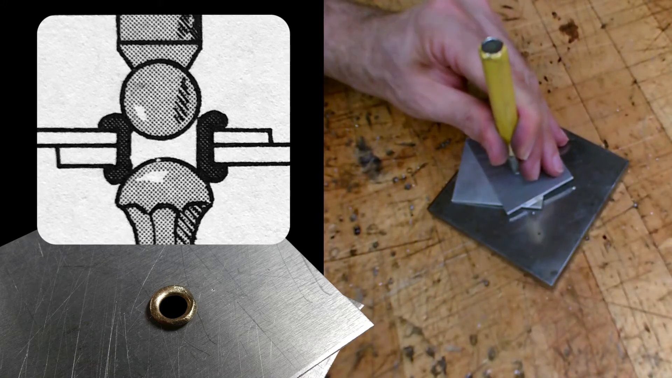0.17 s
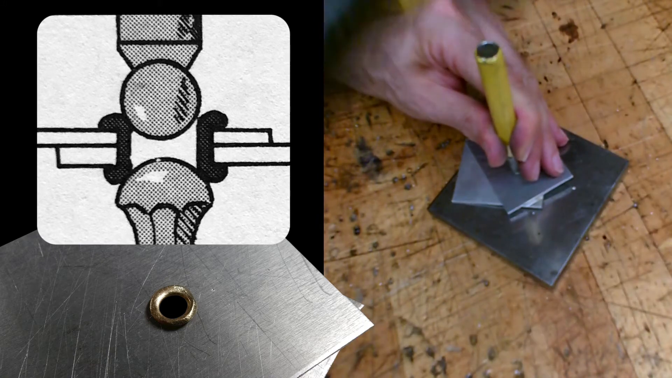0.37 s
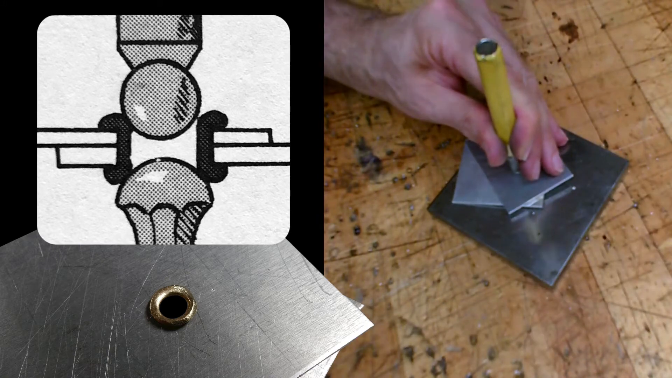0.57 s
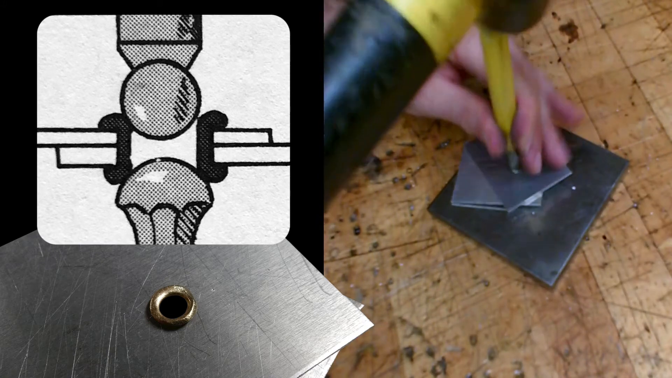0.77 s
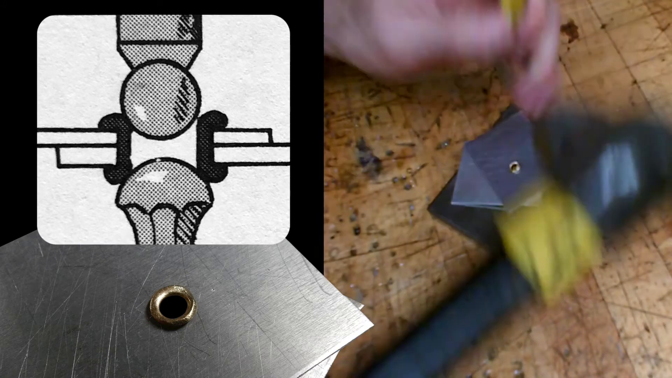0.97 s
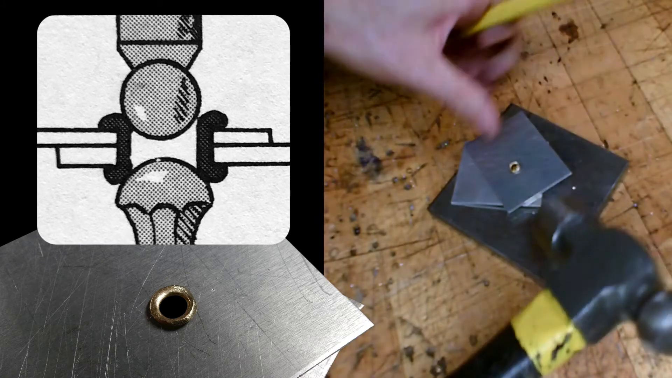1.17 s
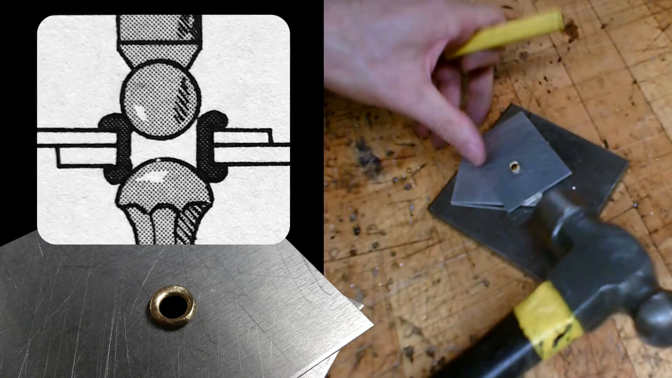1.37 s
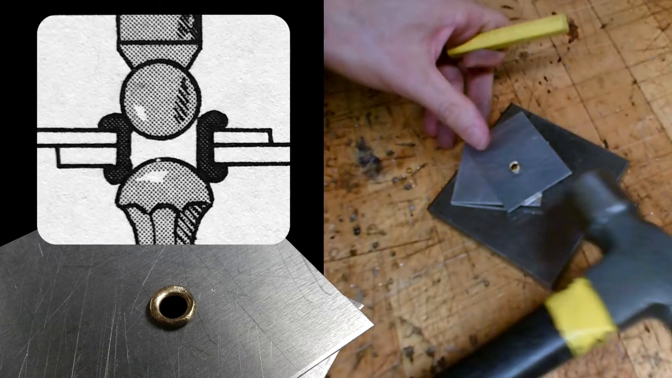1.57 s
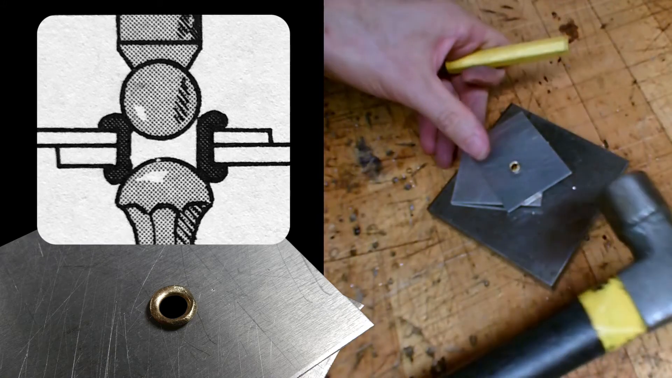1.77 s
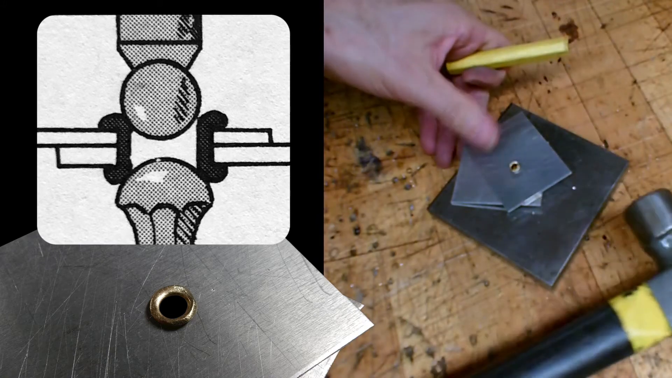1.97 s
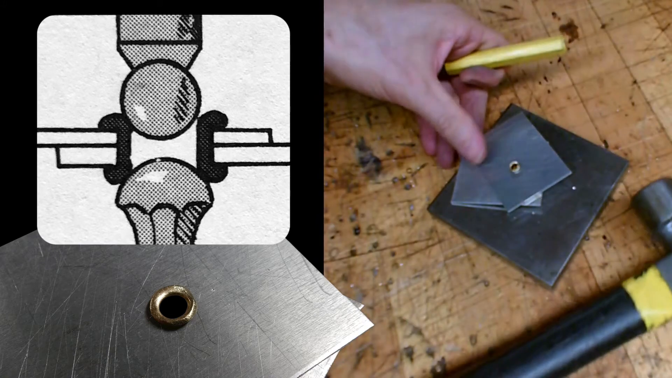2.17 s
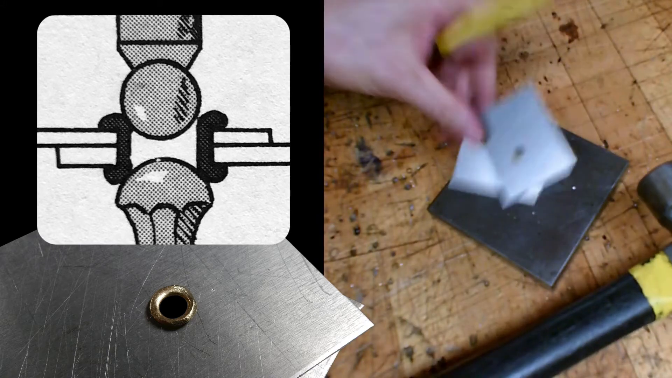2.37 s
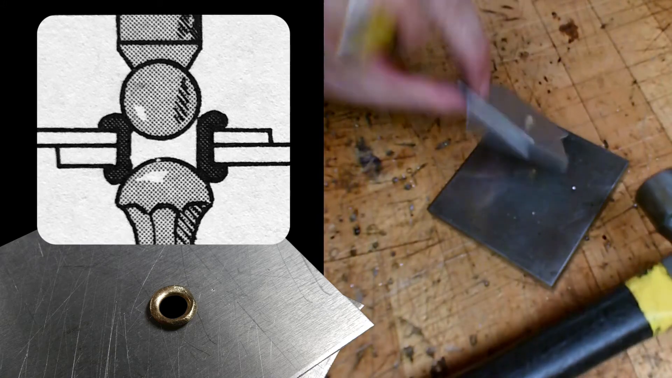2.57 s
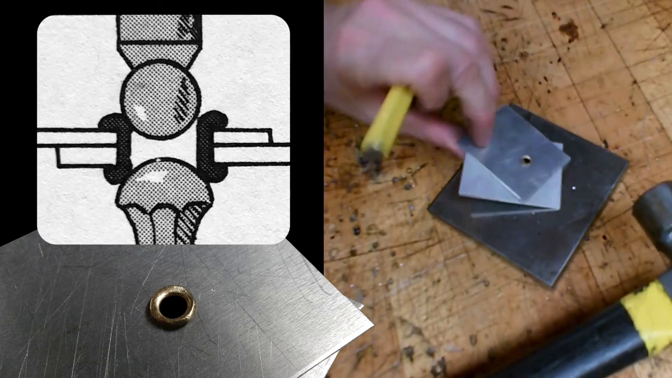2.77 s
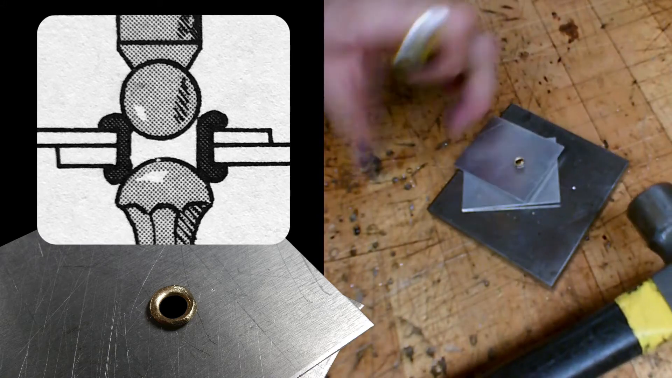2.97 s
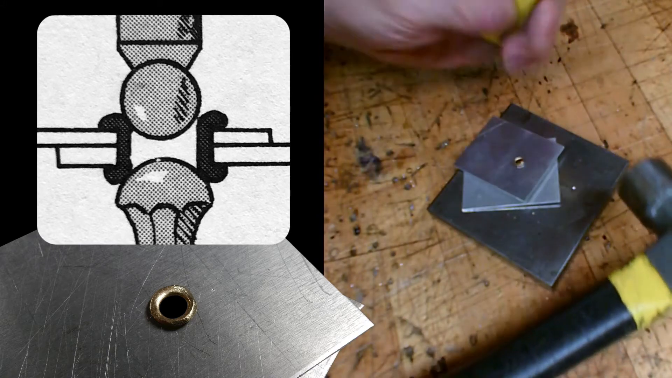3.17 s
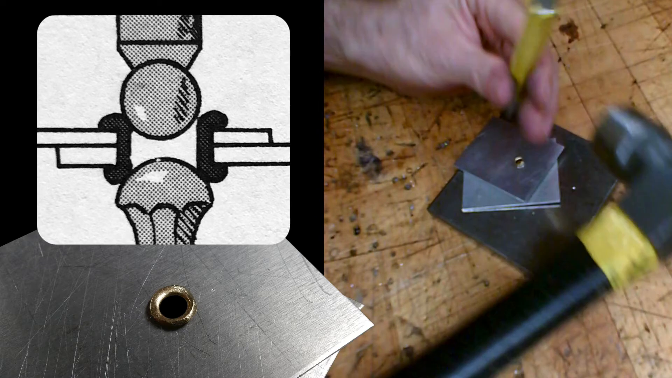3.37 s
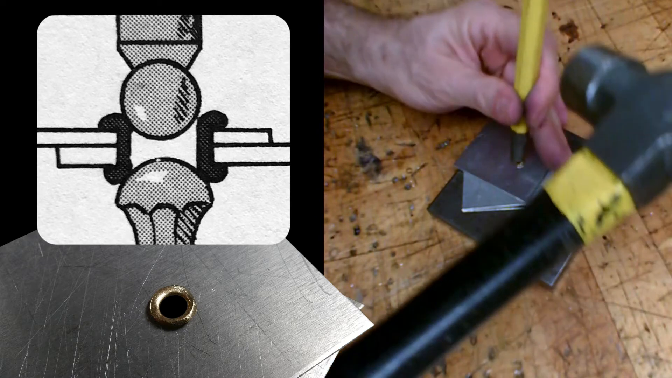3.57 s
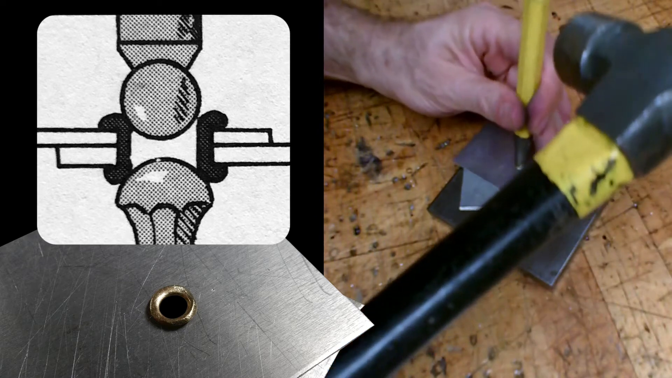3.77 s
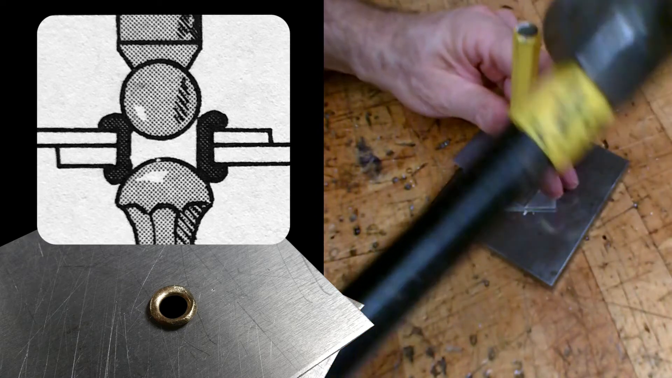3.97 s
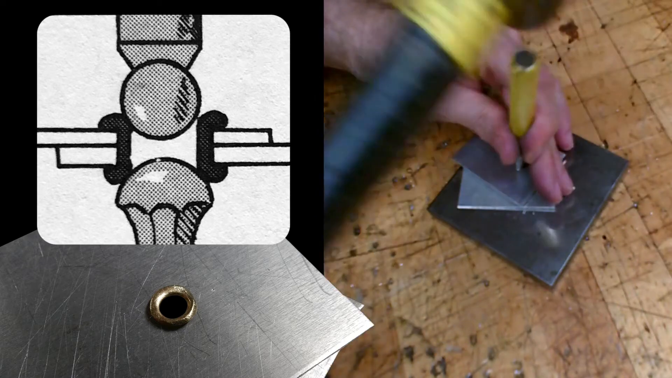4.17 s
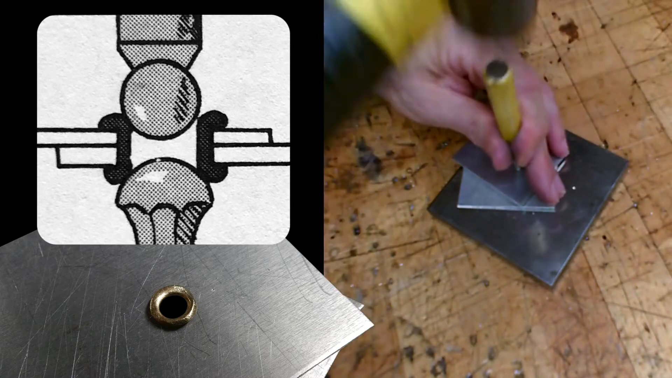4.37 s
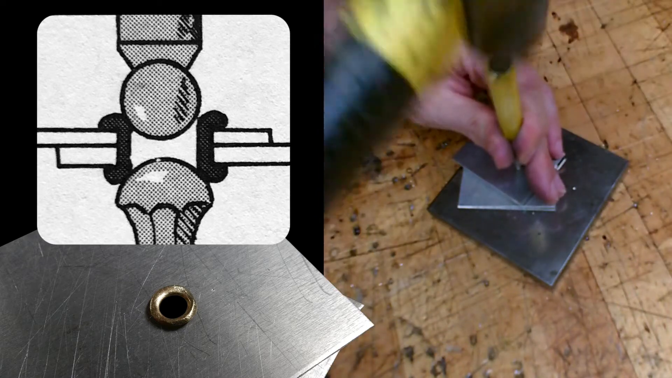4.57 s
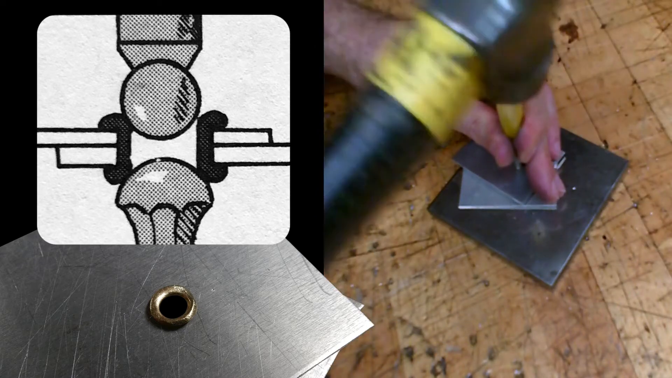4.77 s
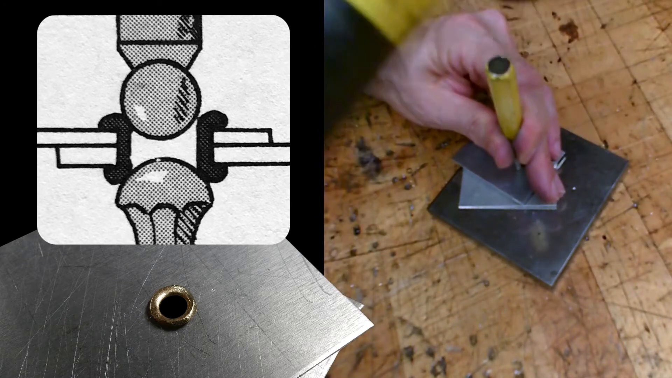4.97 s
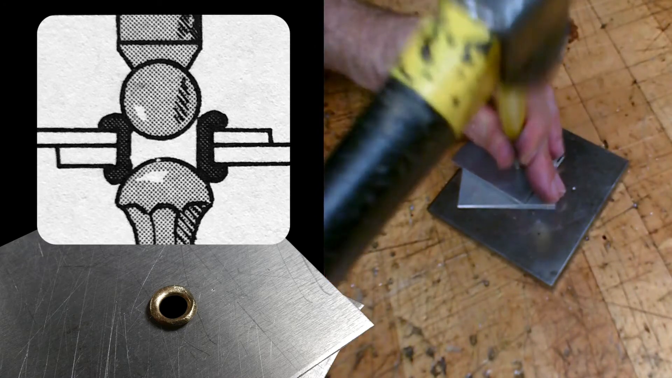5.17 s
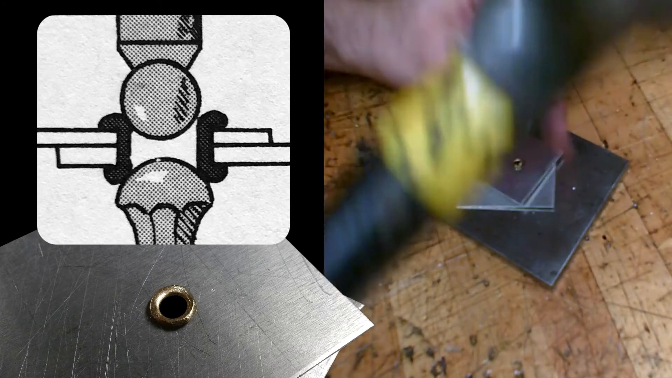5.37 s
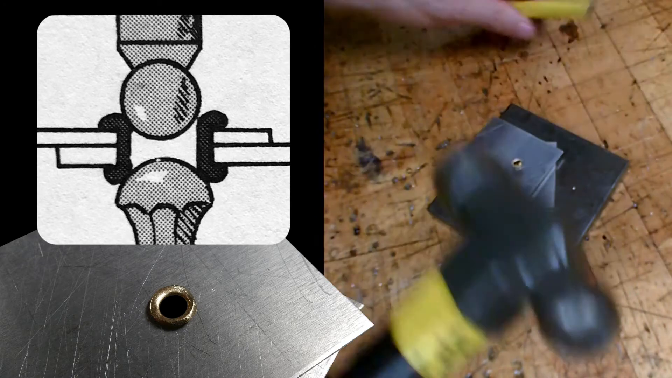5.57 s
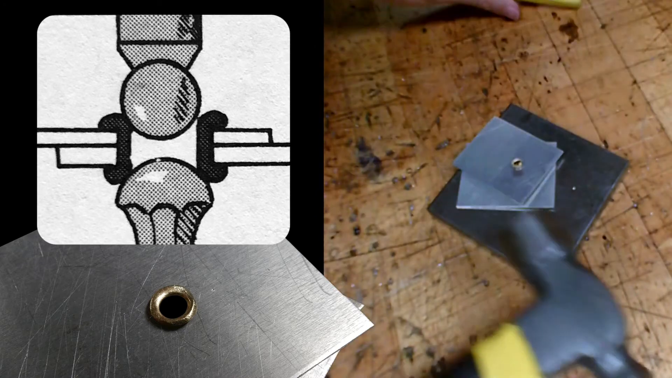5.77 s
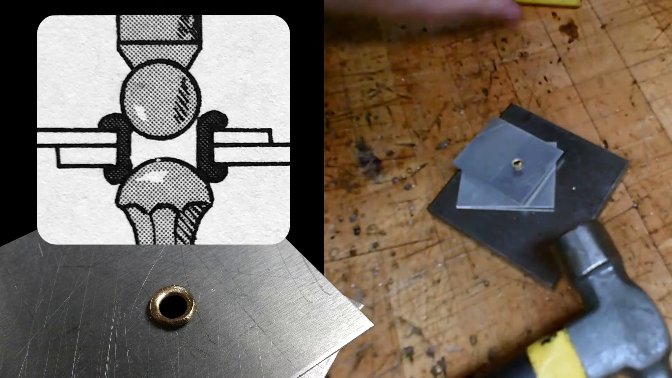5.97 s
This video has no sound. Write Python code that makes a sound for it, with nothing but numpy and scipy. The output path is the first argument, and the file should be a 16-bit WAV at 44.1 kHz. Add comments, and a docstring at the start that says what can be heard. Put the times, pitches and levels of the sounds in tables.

```python
"""Riveting at the workbench

In a workshop, a hammer drives a steel punch onto a rivet in two small plates, on a steel block on a
wooden bench. A brief hiss, two blows, a loose rattle; the plates are turned over, three more blows,
and the hammer is laid down. Ventilation runs behind. The microphone is close: it overloads on the
blows, and again in the draught of the hammer swinging past."""
import sys
import numpy as np
from scipy import signal
from scipy.fft import rfft, irfft
from scipy.io import wavfile
from scipy.ndimage import uniform_filter1d

SR = 44100
rng = np.random.default_rng(int(sys.argv[2]) if len(sys.argv) > 2 else 0)


def to_wav(s):
    """Save 16-bit WAV."""
    ch = np.atleast_2d(s).T  # columns
    pcm = np.round(np.clip(ch, -1, 1) * 32767)  # PCM
    wavfile.write(sys.argv[1], SR, pcm.astype(np.int16))


N = 265702
T = np.arange(SR) / SR  # one second, for single sounds
TIME = np.arange(N) / SR

# hammer blows: start_s, force_db, crack_db, plate_db, punch_db, block_db, plate_tuning_ratio
HAMMER_BLOWS = [(0.2169, -1, 1, -2, -16, 0.5, 0.98), (0.5698, 0, 3, 1, -6.5, -1.5, 1.01),
                (4.4194, -11, 4, -8, -10, -6.5, 0.84), (4.737, -1.5, -0.5, -9.5, -7, -1.5, 1.2),
                (5.0516, -0.5, 2.5, -9.5, 1.5, 2, 1.12)]
# light touch of steel on steel: frequency_hz, density_db
TICK_SPECTRUM = [(1000, -44), (2500, 2.5), (6000, 7), (9000, -1), (15500, -12.5)]
# plate clapping on plate: frequency_hz, density_db
SLAP_SPECTRUM = [(500, -25), (1500, -15), (2500, -8.5), (4000, 0), (6000, 3.5), (8500, 0), (12000, -11),
                 (15500, -11)]


def blows():
    """Steel cracks on steel, plates and block buzz, the bench thuds and everything on it is jolted."""
    # modes of each struck part: pitch_hz, level_db, t60_s
    punch_modes = [(3640, -17, 0.13), (4066, -21, .13), (4200, -22, 0.1), (7974, -30, .08),
                   (9266, -25, 0.045), (10500, -19, 0.1), (13670, -35.5, .08)]
    plate_modes = [(3502, 2, 0.026), (3530, -8.5, 0.015), (4520, -11.5, 0.017), (5280, -9, 0.0077),
                   (6320, -13, 0.0092), (9080, -10, 0.009)]
    block_modes = [(1290, -2.5, 0.0077), (1560, 2, 0.011), (1906, -6.5, .005)]
    bench_modes = [(93.5, -22, .2), (114, -19, 0.17), (169.4, -26.5, 0.3), (248.7, -23, 0.44),
                   (292.3, -15, 0.18), (430.3, -16, 0.11), (457, -21.5, .25), (541.6, -1.5, 0.11),
                   (536.5, -15, .35), (560, -17, 0.41), (622.4, -21.5, 0.073), (767, -18, .16),
                   (975, -9, 0.087), (1234, -15.5, 0.048), (1559, -10, .05), (1880, -23.5, 0.04)]
    # the impact, the plates' after-buzz, things jolted on the bench: frequency_hz, density_db
    crack_spectrum = [(200, 6), (600, 4), (1500, -4), (2500, -4.5), (3800, 11), (6500, -10.5), (9500, 2),
                      (12500, -14.5), (16000, -18.5)]
    sizzle_spectrum = [(1500, -26.5), (2700, -9.5), (3550, -1), (4300, -3.5), (5300, -2.5), (6500, -9),
                       (7800, -18), (10000, -13.5), (16000, -32)]
    jolt_spectrum = [(29, -33), (50, -2), (408, -7.5), (532, -8), (842, -13.5), (997, -0.5), (1300, -17.5),
                     (2440, -17.5), (3580, -16.5), (5270, -21.5), (7210, -33.5), (10600, -31.5),
                     (16000, -42)]
    # the hammer drops back on the punch: start_s, level_db
    rebounds = [(0.242, -21.5), (0.2552, -18.5), (0.578, -6.5), (0.605, -18)]
    body, steel = np.zeros(N), np.zeros(N)
    add(body, -0.135, amp(-4) * room_boom())  # an earlier blow still hangs in the room
    for start, force_db, crack_db, plate_db, punch_db, block_db, tuning in HAMMER_BLOWS:
        crack = amp(crack_db + 6) * noise(crack_spectrum) * swell(0.0009) * fade(0.016)
        punch = amp(punch_db) * ring(punch_modes) * swell(0.00047)
        add(steel, start, amp(force_db) * (crack + punch))
        slap = amp(7) * buzz(plate_modes, tuning) * fade(0.019)
        sizzle = amp(-29) * die_away(noise(sizzle_spectrum))
        add(body, start, amp(force_db + plate_db) * (slap + sizzle) * swell(0.001))
        knock = buzz(block_modes) * (amp(-8.5) * fade(0.06) + amp(-27.5) * fade(0.6))
        add(body, start, amp(force_db + block_db) * knock * swell(0.0048))
        bench = ring(bench_modes, scatter_db=1)
        jolt = amp(-11.5) * noise(jolt_spectrum) * fade(0.19)
        thud = (bench + jolt) * swell(0.002)
        add(body, start + 0.001, amp(force_db) * (thud + room_boom()))
    for start, db in rebounds:
        add(steel, start, amp(db) * noise(crack_spectrum) * fade(0.031))
    return body + in_room(steel, wet_db=-19.5)


def rattle():
    """The second blow sets a loose part jangling; it settles in pairs of stuttering ticks."""
    # the loose part's modes: pitch_hz, level_db, t60_s
    part_modes = [(3520, 4, 0.03), (4310, -7, 0.023), (5490, 4.5, 0.027), (6400, -11, .02),
                  (7680, 1.5, 0.02), (9400, -27, .02), (11800, -27, .02)]
    # its jangle when jolted: frequency_hz, density_db
    jangle_spectrum = [(2500, -28.5), (3550, -8), (4400, -10.5), (5450, 2), (5900, -9), (6400, -6.5),
                       (7500, -18.5), (16000, -36)]
    out = np.zeros(N)
    for start, db in rocking(count=9):
        ping = amp(-9.5) * ring(part_modes, rng.uniform(0.98, 1.02)) * fade(0.048)
        tick = amp(-3.5) * noise(TICK_SPECTRUM) * fade(0.011)
        add(out, start, amp(db) * chatter((ping + tick) * swell(0.0006), spread_s=0.0025, share=0.68))
    out = in_room(out, wet_db=-14)
    jangle = amp(-25.5) * noise(jangle_spectrum) * fade(0.5) * swell(0.0062)
    add(out, HAMMER_BLOWS[1][0], jangle)
    return out


def rocking(count):
    """A part rocks from edge to edge: (start_s, level_db) of ticks whose pairs close up and fade."""
    first_s, extra_tick_s, settle_s = 0.8673, 0.98, 0.76
    rock_db, second_edge_db, settle_db = -34, 1.5, -21.5
    ticks = [(extra_tick_s, rock_db + second_edge_db)]  # one extra tick amid the rocking
    start = first_s
    for k in range(count):
        db = rock_db + settle_db * ((start - first_s) / settle_s) ** 3
        edge_gap_s = 0.0343 * 0.862 ** k
        ticks += [(start, db), (start + edge_gap_s, db + second_edge_db - 0.96 * k)]
        start += 0.05 + 0.068 * np.exp(-((k - 1.4) / 3.3) ** 2)  # slowest while the swing is wide
    return ticks


def plate_clicks():
    """Plates held in the fingers click dully, one edge touching and then the other."""
    # the held plates' modes: pitch_hz, level_db, t60_s
    held_modes = [(2500, -4.5, 0.011), (3186, -9.5, 0.051), (3510, -7, 0.021), (3820, -16, 0.011),
                  (5560, 6, 0.0095), (6300, -23, .018), (7700, -9, 0.03), (8700, -3.5, 0.011),
                  (10500, -28, .015), (11700, -19, .015)]
    # touches: start_s, level_db, tuning_ratio, second_touch_delay_s
    clicks = [(2.047, -47, 0.84, 0.0019), (2.1778, -21.5, 0.98, 0.014), (2.2759, -32.5, 0.9, .001),
              (2.3211, -21.5, 0.89, .004), (2.436, -33.5, 0.96, 0.0022), (2.6006, -16.5, 0.9, .005),
              (2.639, -23.5, 0.93, 0.0037), (2.676, -31, 0.89, 0.00089), (2.742, -28, 0.87, .003),
              (2.8539, -37, 0.85, .002), (5.28, -26, 0.87, .0136), (5.767, -31.5, 0.84, 0.02)]
    out = np.zeros(N)
    for start, db, tuning, gap in clicks:
        for delay, touch_db in (0, 0), (gap, -0.5):
            ping = amp(-12) * ring(held_modes, tuning, scatter_db=3.5)
            slap = amp(-10.5) * noise(SLAP_SPECTRUM) * fade(0.016)
            click = chatter((ping + slap) * swell(0.00056), spread_s=0.005, share=0.27)
            add(out, start + delay, amp(db + touch_db) * click)
    return out


def punch_taps():
    """The punch tip feels for the rivet, skittering at each touch."""
    # modes of the tip on the rivet: pitch_hz, level_db, t60_s
    tip_modes = [(3550, 4.5, 0.045), (4230, -0.5, 0.032), (6000, -13.5, 0.023), (8270, -6.5, 0.027),
                 (10600, -16, 0.017), (12200, -11.5, .02)]
    # touches: start_s, ring_db, tick_db
    taps = [(3.603, -44, -49.5), (3.6245, -37.5, -43.5), (3.702, -51, -49.5), (3.757, -47.5, -61),
            (3.7818, -50, -37)]
    out = np.zeros(N)
    for start, ring_db, tick_db in taps:
        ping = amp(ring_db) * ring(tip_modes, rng.uniform(0.92, 1.03))
        tick = amp(tick_db) * noise(TICK_SPECTRUM) * fade(0.038)
        add(out, start, chatter(ping + tick, spread_s=0.02, share=0.44))
    return out


def plate_slides():
    """The plates slide with a faint, gritty scrape."""
    # scrapes: middle_s, length_s, level_db
    slides = [(2.384, 0.094, -49.5), (2.625, 0.084, -52), (2.826, .07, -59.5), (5.297, 0.026, -43.5)]
    out = np.zeros(N)
    for middle, length, db in slides:
        size = round(length * SR)
        grit = unit_rms(uniform_filter1d(rng.exponential(1, size) ** 2, size=40))
        scrape = noise(TICK_SPECTRUM, size) * grit * signal.windows.hann(size)
        add(out, middle - length / 2, amp(db) * scrape)
    return out


def plates_drop():
    """The plates clap down edge by edge; each contact bends their modes, and the block damps them."""
    # the free plates' modes: pitch_hz, level_db, t60_s
    free_modes = [(2966, -3.5, 0.13), (3112, -10.5, 0.2), (3330, -10.5, 0.16), (3800, -1.5, 0.18),
                  (4040, -7, 0.17), (4620, -5.5, 0.25), (4660, -4.5, 0.14), (6050, -12, 0.075),
                  (6300, 0, 0.13), (6920, 6, 0.037), (7700, 4.5, 0.034), (8160, 6, 0.035),
                  (10450, 7, 0.027), (12500, -3, .04)]
    # contacts with the block: start_s, ring_db, slap_db
    drops = [(2.8718, -44, -36), (2.8905, -33.5, -25.5), (2.897, -34.5, -25.5), (2.904, -36.5, -23.5),
             (2.9334, -45.5, -39)]
    out = np.zeros(N)
    for start, ring_db, slap_db in drops:
        tuning = 1 + 0.012 * rng.standard_normal()
        ringing = amp(ring_db + 1) * ring(free_modes, tuning, scatter_db=2) * fade(0.77)
        slap = amp(slap_db) * noise(SLAP_SPECTRUM) * fade(0.033)
        add(out, start, ringing + slap)
    return in_room(out, wet_db=-13.5)


def hammer_down():
    """The hammer's head touches the bench, drags with a squeak, lands with a clatter and rings on."""
    # the hammer's modes: pitch_hz, level_db, t60_s
    hammer_modes = [(1456, -1, 0.94), (4440, -1.5, 1.1), (11370, -22, 0.99), (12430, -36, 0.74)]
    # its knock on the wood: frequency_hz, density_db
    knock_spectrum = [(88, -42), (150, -16), (833, -3), (1180, -5.5), (1460, -3.5), (2000, -9),
                      (2600, -7.5), (3400, -10), (3900, -21), (4400, -20), (4910, -31), (10600, -47),
                      (11700, -44), (15000, -78.5)]
    # contacts, damped by the gripping hand: start_s, knock_db, ring_db, grip_t60_s
    contacts = [(5.738, -47, -49.5, 0.32), (5.797, -40.5, -66, 0.26), (5.8944, -21.5, -32.5, 5.5)]

    def knock():
        return noise(knock_spectrum) * (amp(8) * fade(0.021) + amp(-7) * fade(0.83)) * swell(0.0004)
    out = np.zeros(N)
    for start, knock_db, ring_db, grip_t60 in contacts:
        add(out, start, amp(knock_db) * knock())
        add(out, start, amp(ring_db) * ring(hammer_modes) * fade(grip_t60) * swell(0.0045))
    dragged_s, landed_s = contacts[1][0], contacts[2][0]
    for k in range(3):  # let go, it bounces evenly between head and handle
        add(out, landed_s + 0.008 + k * 0.034, amp(-32) * knock())
    add(out, dragged_s, squeak())
    return out


def squeak():
    """The dragged head catches sharply, then slides faintly as the pitch climbs."""
    from_hz, to_hz = 1550, 2370
    hz = from_hz + (to_hz - from_hz) * swell(0.025)
    catch, drag = amp(-37) * fade(0.052), amp(-55) * fade(2.5)
    return (catch + drag) * glide(hz, width_hz=125)


def hiss():
    """A brief, wide hiss narrows to a rough whistle, slips down in pitch and stops."""
    from_hz, to_hz, slip_at_s, slip_s = 5700, 3780, 0.04, 0.022
    hold_s, release_db_per_s = 0.095, 648
    hz = from_hz + (to_hz - from_hz) * (1 + np.tanh((T - slip_at_s) / slip_s)) / 2
    level = amp(-38 - release_db_per_s * np.maximum(T - hold_s, 0))
    wide = noise([(2500, -29), (4200, 0), (7000, -1.5), (8200, -13.5), (12000, -20), (16000, -40)])
    whistle = amp(0.5) * glide(hz, width_hz=130) * (1 - fade(0.56))
    out = np.zeros(N)
    add(out, 0, level * (whistle + wide * fade(0.49)))
    return out


def draught():
    """Sweeps of hand or hammer suck, push and suck again at the microphone; stirred air rumbles."""
    # passing gusts: middle_s, rise_s, pressure_ratio (to full scale)
    gusts = [(1.071, 0.004, 0.087), (1.165, 0.0044, 0.053), (5.486, 0.01923, 2.58), (5.618, .011, 0.36)]
    # low rumbles of stirred air at the microphone: middle_s, length_s, level_db
    rumbles = [(0.919, 0.11, -35.5), (4.7, 0.059, -29.5), (5.365, 0.31, -33.5), (5.662, 0.19, -30)]
    push, rumble_level = np.zeros(N), np.zeros(N)
    for middle, rise, pressure in gusts:
        u = (TIME - middle) / np.where(TIME < middle, rise, rise * 2.07)  # ebbs slower than it builds
        push += pressure * (1 - u ** 2) * np.exp(-u ** 2 / 2)
    for middle, length, db in rumbles:
        rumble_level += amp(db) * np.cos(np.pi * np.clip((TIME - middle) / length, -0.5, 0.5)) ** 2
    rumble = noise([(15, -1), (45, 6), (110, -12), (250, -24), (1000, -54.5), (4000, -100)], N)
    return push + rumble_level * rumble


def room_boom():
    """The workshop's echo of one blow."""
    # the echo's colour: frequency_hz, density_db
    boom_spectrum = [(29, -47), (50, -13), (96, -4.5), (125, -19), (229, -7), (337, -5), (371, -5.5),
                     (507, -1), (559, -1.5), (729, -10.5), (1580, -20.5), (2810, -29), (5270, -34),
                     (11700, -43), (16000, -58)]
    return amp(-14) * die_away(noise(boom_spectrum)) * swell(0.0034)


def in_room(x, wet_db):
    """The direct sound plus the workshop's diffuse answer."""
    tail = die_away(rng.standard_normal(SR)) * swell(0.0046)
    return x + amp(wet_db) * signal.fftconvolve(x, tail / np.linalg.norm(tail))[:N]


def die_away(x):
    """Each band of a diffuse sound dies at the room's own speed."""
    # the workshop's reverberation: frequency_hz, t60_s
    room_decay = [(80, 0.77), (250, 0.58), (500, 0.6), (1000, 0.68), (2500, 0.76), (5000, .62), (8000, .46),
                  (11000, 0.38), (16000, 0.38)]
    hz, t, bands = signal.stft(x, SR, nperseg=256)
    bands = bands * fade(curve_at(room_decay, hz)[:, None], t)
    return signal.istft(bands, SR, nperseg=256)[1][:SR]


def ventilation():
    """Room tone: the ventilation's steady dull rush over an uneven rumble."""
    # moving air: frequency_hz, density_db
    air_spectrum = [(20, 2), (60, 2.5), (130, -2.5), (250, -4), (500, -10), (1000, -13.5), (2000, -21),
                    (3200, -24), (4100, -32), (5200, -37.5), (7000, -43.5), (10000, -51), (13000, -56.5),
                    (16000, -68.5)]
    rumble = amp(-45.5) * noise([(10, 2.5), (35, -4), (80, -17.5), (200, -46), (1000, -88.5)], N)
    return amp(-48.5) * noise(air_spectrum, N) + rumble


def ring(modes, tuning=1, scatter_db=0):
    """Dying modes of alternating sign; the point of contact favours some of them."""
    out = np.zeros(SR)
    for k, (hz, db, t60) in enumerate(modes):
        level = (-1) ** k * amp(db + scatter_db * rng.standard_normal())
        out += level * fade(t60) * np.sin(2 * np.pi * hz * tuning * T)
    return out


def buzz(modes, tuning=1):
    """Parts slapping on each other blur their modes into bands of noise."""
    hz = np.fft.rfftfreq(SR, 1 / SR)
    power = sum(amp(db) ** 2 / (1 + ((hz - f * tuning) * t60) ** 2) ** 2 for f, db, t60 in modes)
    return unit_rms(irfft(rfft(rng.standard_normal(SR)) * np.sqrt(power), SR))


def chatter(x, spread_s, share):
    """Steel never lands just once: three weaker contacts follow at random."""
    out = x.copy()
    for delay, size in rng.random((3, 2)):
        add(out, delay * spread_s, share * size * x)
    return out


def glide(hz, width_hz):
    """Narrow noise that follows a moving pitch."""
    carrier = np.exp(2j * np.pi * np.cumsum(hz) / SR)
    blur = noise([(0, 0), (width_hz, -3), (4 * width_hz, -22), (12 * width_hz, -55), (SR, -120)])
    wander = np.exp(1j * np.cumsum(rng.standard_normal(SR)) * np.sqrt(np.pi * width_hz / SR))
    return unit_rms((blur * carrier * wander).real)


def noise(spectrum, size=SR):
    """Noise of rms 1, coloured by (frequency_hz, density_db) points."""
    gain = amp(curve_at(spectrum, np.fft.rfftfreq(size, 1 / SR)))
    return unit_rms(irfft(rfft(rng.standard_normal(size)) * gain, size))


def curve_at(points, hz):
    """Interpolates along a log-frequency axis."""
    point_hz, values = np.transpose(points)
    return np.interp(np.log(hz + 1), np.log(point_hz + 1), values)


def add(mix, start_s, sound):
    """Mixes a sound in; what lies outside the mix is dropped."""
    at = round(start_s * SR)
    sound = sound[max(-at, 0):]
    part = mix[max(at, 0):][:len(sound)]
    part += sound[:len(part)]


def fade(t60_s, t=T):
    return np.exp(-np.log(1000) * t / t60_s)


def swell(rise_s):
    return 1 - np.exp(-T / rise_s)


def amp(db):
    return 10 ** (np.asarray(db) / 20)


def unit_rms(x):
    return x / np.sqrt(np.mean(x ** 2) + 1e-20)


def scene():
    """The bench from close by, in mono."""
    hammering = blows() + rattle()
    handling = in_room(plate_clicks() + punch_taps() + plate_slides(), wet_db=-13)
    return (hammering + handling + plates_drop() + hammer_down() + hiss() + draught() + ventilation())[None]


def record(dry):
    """The close microphone saturates, choking all sound while pinned; then bass and treble cuts."""
    ceiling, bass_cut_hz, treble_cut_hz = 0.68, 42, 15900
    pinned = dry / (1 + (dry / ceiling) ** 16) ** (1 / 16)
    thinned = signal.lfilter(*signal.butter(1, bass_cut_hz, "high", fs=SR), pinned)
    lowpass = signal.firwin(161, treble_cut_hz, window=("kaiser", 9), fs=SR)
    return signal.oaconvolve(thinned, lowpass[None], "same")


dry = scene()
out = record(dry)
to_wav(out)
```